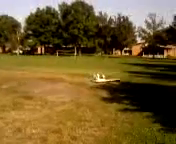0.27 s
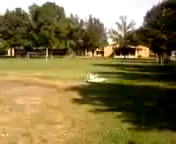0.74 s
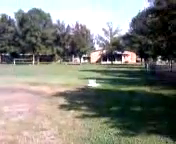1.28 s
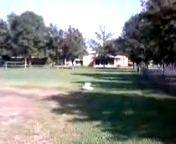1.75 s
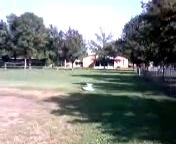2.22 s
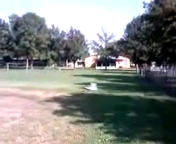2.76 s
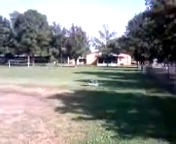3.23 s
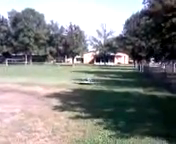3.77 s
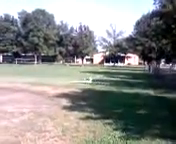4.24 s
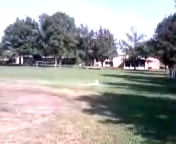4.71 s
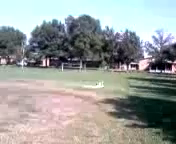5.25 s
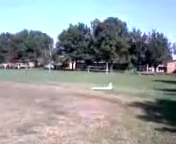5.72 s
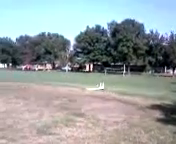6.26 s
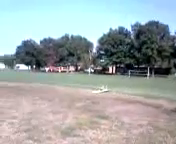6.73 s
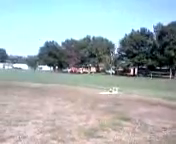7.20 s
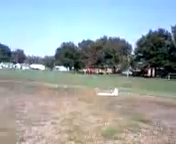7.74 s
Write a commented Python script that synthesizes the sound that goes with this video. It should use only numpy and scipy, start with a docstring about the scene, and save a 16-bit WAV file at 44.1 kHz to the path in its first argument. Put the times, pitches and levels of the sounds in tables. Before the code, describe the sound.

The small two-stroke engine of a model hovercraft buzzes on an open lawn. Almost at once it misfires and sags in pitch, with a brief hollow knock on the microphone. It then revs back up and holds a steady, raspy buzz whose tone shifts as the craft turns. The fan hums and rushes softly underneath, and a light breeze touches the distant, narrow-sounding microphone.

```python
"""The small two-stroke engine of a model hovercraft buzzes round a lawn, one exhaust pop a shaft turn.
The throttle closes, it misses every other firing and sags, then catches and revs back to a steady buzz.
The exhaust changes colour as the craft turns; hull, lawn and trees throw it back, and the fan hums and
rushes underneath. A breeze touches the distant, narrow-band microphone; the loudest pops overload it."""
import sys
import numpy as np
from scipy import signal
from scipy.fft import rfft, irfft
from scipy.io import wavfile
from scipy.ndimage import map_coordinates

SR = 44100
rng = np.random.default_rng(int(sys.argv[2]) if len(sys.argv) > 2 else 0)


def unload_wav(signal):
    """Save mono or channel-first audio to the path in sys.argv[1] as 16-bit WAV at rate SR, clipped to [-1, 1]."""
    wavfile.write(
        sys.argv[1],
        SR,
        np.round(np.clip(np.atleast_2d(signal).T, -1, 1) * 32767).astype(np.int16),
    )


N = 351918
T = np.arange(N) / SR
HZ = np.fft.rfftfreq(N, 1 / SR)


def gain_of(db):
    """Decibels to amplitude."""
    return 10 ** (np.asarray(db) / 20)


def unit_rms(x):
    """Scales to an rms of one."""
    return x / np.sqrt(np.mean(x ** 2) + 1e-20)


def at_hz(points, hz):
    """Reads a spectrum table on a log-frequency axis."""
    f, value = np.transpose(points)
    return np.interp(np.log(hz + 1), np.log(f + 1), value)


def curves(rows):
    """Each column of a time table as an automation curve."""
    times, *columns = np.transpose(rows)
    return [np.interp(T, times, column) for column in columns]


def swells(rows):
    """A bell-shaped rise and fall for each row."""
    return sum(gain_of(db) * np.exp(-(2 * (T - t) / length) ** 2) for t, db, length in rows)


def wander(rate_hz):
    """Slow random modulation, rms one."""
    return unit_rms(irfft(rfft(rng.standard_normal(N)) / (1 + (HZ / rate_hz) ** 4), N))


def noise(colour):
    """Steady noise of a given spectrum, rms one."""
    return unit_rms(irfft(rfft(rng.standard_normal(N)) * gain_of(at_hz(colour, HZ)), N))


def ring(x, colour, size=4096):
    """Causal filter: each click starts sharply and rings out with the given spectrum."""
    log_gain = np.log(gain_of(at_hz(colour, abs(np.fft.fftfreq(size, 1 / SR)))))
    response = np.fft.ifft(np.exp(np.conj(signal.hilbert(log_gain)))).real
    return signal.oaconvolve(x, response[:size // 2])[:N]


def running_rms(x, size=5001):
    """Level follower; the default window spans about a dozen firings."""
    window = signal.windows.hann(size)
    power = np.pad(x ** 2, size // 2, "reflect")
    return np.sqrt(signal.oaconvolve(power, window / window.sum(), "valid") + 1e-14)


def low_pass(x, hz):
    """Steep band limit."""
    return signal.oaconvolve(x, signal.firwin(511, hz, window=("kaiser", 9), fs=SR), "same")


def swept_bell(x, hz, width_hz, lift_db):
    """Boosts or cuts a band that follows the curve hz."""
    carrier = np.exp(2j * np.pi * np.cumsum(hz) / SR)
    pole = np.exp(-np.pi * width_hz / SR)
    band = 2 * (carrier * signal.lfilter([1 - pole], [1, -pole], x / carrier)).real
    return x + (gain_of(lift_db) - 1) * band


# colour of the outdoor bed: f/Hz, level/dB
AIR_COLOUR = [(30, -0.5), (200, -4.5), (700, 1.5), (1400, -6.5), (3300, -6), (3900, -4.5), (4450, -1.5),
              (4650, -17), (5200, -79.5)]

def open_air(level_db=-62):
    """The faint, steady hiss of the open air."""
    return gain_of(level_db) * noise(AIR_COLOUR)


# colour of the wind rumble: f/Hz, level/dB
BREEZE_COLOUR = [(15, -8), (30, -10), (60, -12), (110, -5), (180, -10.5), (350, -11), (900, -42),
                 (3000, -66)]
# gusts: t/s, level/dB, length/s
GUSTS = [(0.1, -62, 0.21), (0.41, -45, 0.25), (1.2, -65, 0.43), (1.9, -53, 0.86), (2.55, -48.5, 0.61),
         (3.2, -50.5, 0.57), (3.95, -61.5, 1)]

def breeze(calm_db=-59, lumpy_db=3):
    """Lumpy rumble of air on the microphone, swelling with each gust."""
    rumble = noise(BREEZE_COLOUR) * gain_of(lumpy_db * wander(4.5))
    return (gain_of(calm_db) + swells(GUSTS)) * unit_rms(rumble)


# thud hits: t/s, level/dB, length/s
THUDS = [(0.388, -45, 0.0084), (0.404, -29, 0.0074)]
# their hollow colour: f/Hz, level/dB
THUD_COLOUR = [(40, -11), (130, -6), (350, 20.5), (600, -7), (1500, -22), (4000, -70)]

def thuds():
    """Two short, hollow knocks on the microphone."""
    return swells(THUDS) * noise(THUD_COLOUR)


# crankshaft revs: t/s, rate/Hz
SHAFT_SPEED = [(0.0, 116.38), (0.2, 118.31), (0.3, 109.83), (0.45, 97.86), (0.6, 90.86), (0.7, 92.32),
               (0.82, 90.07), (1.0, 90.17), (1.1, 94.13), (1.35, 107.63), (1.55, 115.05), (1.9, 119.59),
               (2.1, 119.41), (2.4, 117.35), (2.8, 117.08), (3.45, 116.86), (3.7, 117.13), (4.2, 116.3),
               (4.55, 117.65), (4.85, 117.47), (5.15, 118.1), (5.5, 117.55), (5.9, 116.97), (6.1, 117.36),
               (6.7, 116.81), (7.1, 118.0), (7.3, 118.11), (7.7, 119.04), (7.98, 118.28)]

def shaft_turns():
    """Running count of turns of the shaft, which times both fan and firings."""
    return np.cumsum(curves(SHAFT_SPEED)[0]) / SR


# colour of the air through the fan: f/Hz, level/dB
RUSH_COLOUR = [(100, -25), (300, -4), (750, 0), (1100, -1.5), (1400, -3), (1800, 1.5), (2500, -8.5),
               (3500, -11.5), (4500, -44), (5200, -69)]
# its fader ride: t/s, level/dB
RUSH_LEVEL = [(0, -40.5), (0.3, -39), (0.62, -47.5), (1.1, -46.5), (1.7, -47.5), (2.6, -42.5), (3.8, -46.5),
              (4.6, -48), (5.6, -45), (6.7, -42.5), (7.05, -46.5), (7.98, -42)]

def fan_rush(chop=0.27, gusty_db=2.5):
    """Turbulent air, chopped once a turn of the shaft."""
    chopping = 1 + chop * np.cos(2 * np.pi * shaft_turns())
    rush = noise(RUSH_COLOUR) * chopping * gain_of(gusty_db * wander(1.9))
    return gain_of(curves(RUSH_LEVEL)[0]) * unit_rms(rush)


# fader ride of the blade hum, ahead of its trim: t/s, level/dB
HUM_LEVEL = [(0.0, -53), (0.22, -40.5), (0.73, -95), (1.02, -63), (1.3, -61.5), (1.77, -43.5),
             (2.45, -41.5), (4.85, -52.5), (5.38, -47), (6.31, -59.5), (7.15, -50.5), (7.35, -61),
             (7.95, -52)]
# its partials: multiple of the shaft speed, level/dB
HUM_PARTIALS = [(1, -18.5), (2, -0.5), (3, -7)]

def fan_hum(trim_db=2.0, blade_waver_db=2.0, weak_waver_db=3.5):
    """Clean tones of blades passing twice a turn; moving air sways the weaker tones most."""
    turns = shaft_turns()
    tones = 0
    for order, db in HUM_PARTIALS:
        waver_db = blade_waver_db if order == 2 else weak_waver_db
        tones += gain_of(db + waver_db * wander(11)) * np.cos(2 * np.pi * order * turns)
    return gain_of(curves(HUM_LEVEL)[0] + trim_db) * unit_rms(tones)


# grit of the buzz: t/s, roughness (0 clean, 1 hoarse)
ROUGHNESS = [(0, .3), (.6, .15), (.85, .4), (1.1, .2), (1.7, .2), (1.9, .05), (2.15, .1), (2.23, 1),
             (2.33, .15), (2.48, .8), (2.67, .15), (2.8, .6), (3.1, .15), (3.33, 1), (3.5, .35),
             (3.63, .85), (3.8, .15), (3.98, .15), (4.08, .85), (4.37, .65), (4.48, .05), (5.0, .05),
             (5.08, .4), (5.3, 0), (5.7, .05), (5.83, .7), (6.05, .25), (6.35, .9), (6.85, 1), (6.96, .05),
             (7.15, .05), (7.23, .9), (7.35, .3), (7.7, .3), (7.83, .7), (7.98, .05)]

def by_roughness(clean, hoarse):
    """Morphs a setting from clean to hoarse as the burn and the air on the way grow unsteady."""
    return clean + (hoarse - clean) * curves(ROUGHNESS)[0]


# decay of the tree reverb: f/Hz, t60/s
TREE_DECAY = [(100, 0.3), (1000, 0.8), (3000, 0.69), (6000, 0.2)]
# its colour: f/Hz, level/dB
TREE_COLOUR = [(300, -8), (1000, -6), (2500, 0), (4000, -1)]

def trees(x, drift_per_s=(.5, 9), density=.05):
    """Scatter from trunks and leaves, as loud as x; three tails crossfade as the craft moves."""
    wet = np.zeros(N)
    drift = np.cumsum(by_roughness(*drift_per_s)) / SR
    for k in range(3):
        taps = rng.standard_normal(SR) * (rng.random(SR) < density)
        hz, t, spectra = signal.stft(taps, SR, nperseg=256)
        t60 = at_hz(TREE_DECAY, hz)[:, None]
        decay = gain_of(at_hz(TREE_COLOUR, hz)[:, None] - 60 * t / t60) / np.sqrt(t60)
        tail = signal.istft(spectra * decay, SR, nperseg=256)[1]
        wet += np.cos(np.pi * (drift + k / 3)) * signal.oaconvolve(x, unit_rms(tail))[:N]
    return wet / running_rms(wet, size=40001) * running_rms(x, size=40001)


# early reflections: t/s, hull echo as a share of the direct sound, lawn bounce lag/s
REFLECTIONS = [(0, 0.51, 0.00029), (1.15, 0.11, 0.00037), (2.05, 0.14, 0.00065), (3.1, 0.06, 0.00062),
               (3.55, 0.18, 0.00077), (4.0, 0.1, 0.00081), (4.4, 0.39, 0.0016), (5.2, 0.46, 0.0011),
               (5.75, 0.11, 0.00132), (6.4, 0.19, 0.0012), (7.2, 0.11, 0.001), (7.8, 0.22, .0011)]
# tree return, whichever way the outlet points, weighed against the direct level: t/s, level/dB
TREE_RETURN = [(0, -27), (.3, -24.5), (.6, -23), (1.1, -28.5), (1.35, -23), (1.7, -25), (2, -25), (3, -24),
               (4.7, -28), (6.5, -24), (7.98, -24.5)]

def travel(x, direct_level, hull_s=0.001486, duct_s=0.002358, duct=0.18, ground=0.23,
           sway=0.027, bumps=0.3):
    """Direct sound, echoes off hull, fan duct and lawn that shift as the craft rocks, and the trees."""
    def delayed(lag_s):
        """The sound after a changing delay."""
        return map_coordinates(x, [(T - lag_s) * SR], order=1)

    hull, ground_s = curves(REFLECTIONS)
    rock = 1 + sway * wander(0.86)
    craft = hull * delayed(hull_s * rock) + duct * delayed(duct_s * rock)
    lawn = ground * delayed(ground_s * (1 + by_roughness(0, bumps) * wander(12.0)))
    wet_share = gain_of(curves(TREE_RETURN)[0]) / direct_level  # weaker direct sound, more trees
    return x + craft + lawn + wet_share * trees(x)


# moving notch or peak of the lawn bounce: t/s, f/Hz, gain/dB
LAWN_SWEEP = [(0, 2550, -5.5), (.6, 2340, 4), (.9, 3320, 6.5), (1.6, 3550, 7), (1.9, 3190, -10),
              (2.15, 3130, -10.5), (2.3, 3120, -16), (2.42, 2600, -4.5), (2.8, 2940, -12),
              (3.2, 2510, -5.5), (3.36, 2950, -2), (3.58, 3060, -12), (3.75, 3140, 0), (3.95, 3070, 8),
              (4.1, 3320, -3.5), (4.7, 3120, -3), (5.2, 3260, 3), (5.3, 3210, 8), (5.6, 3020, -9),
              (5.9, 3160, -1), (6.15, 3030, -2.5), (6.45, 3150, -11), (6.7, 2910, -8), (6.95, 2810, -13.5),
              (7.3, 3340, -13), (7.6, 3170, -1.5), (7.98, 3160, -4)]

def lawn_sweep(x, width_hz=380):
    """The bounce off the lawn hollows or lifts a band of the buzz as the craft moves."""
    hz, lift_db = curves(LAWN_SWEEP)
    return swept_bell(x, hz, width_hz, lift_db)


def shimmer(x, depth_db=2.5, size=1024):
    """Turbulent air makes neighbouring partials swell and fade on their own, several times a second."""
    frames = dict(nperseg=size, noverlap=size * 3 // 4)
    spectra = signal.stft(x, **frames)[2]
    patch = np.outer(signal.windows.hann(7), signal.windows.hann(21))  # bins by frames
    field = unit_rms(signal.fftconvolve(rng.standard_normal(spectra.shape), patch, "same"))
    return signal.istft(spectra * gain_of(depth_db * field), **frames)[1][:N]


def firings(misfire_s=(0.22, 0.6), stall_s=(0.445, 0.495), miss_db=-20, limp_db=-1.5,
            uneven_db=.6, jitter_s=(4e-6, 3e-5), stumble_db=2.5, stumble_s=0.000257,
            start_turn=.78, hunt_turns=.003):
    """Time and strength of each burn, one a turn; starved, the engine stumbles and skips every other."""
    turns = start_turn + shaft_turns() + hunt_turns * wander(12.0)
    count = np.arange(1, int(turns[-10]) + 1)
    t = np.interp(count, turns, T)
    late, strong = rng.standard_normal((len(t), 2)).T
    starved = (t > misfire_s[0]) & (t < misfire_s[1])
    stalled = (t > stall_s[0]) & (t < stall_s[1])
    missed = (starved & (np.cumsum(starved) % 2 == 1)) | stalled
    limp = limp_db * (-1) ** count * np.interp(t, T, wander(0.87))  # a weak burn follows a strong one
    choke_db = -4.5 * np.exp(-(2 * (t - .42) / .2) ** 2)  # weakest in the middle of the misfire
    spread_db = np.where(starved, stumble_db, uneven_db)
    spread_s = np.where(starved, stumble_s, np.interp(t, T, by_roughness(*jitter_s)))
    return t + late * spread_s, gain_of(spread_db * strong + limp + choke_db + miss_db * missed)


# colour of the escaping gas: f/Hz, level/dB
JET_COLOUR = [(500, -12), (2200, 0)]
# colour of one pop: f/Hz, level/dB
POP_COLOUR = [(60, -41.5), (120, -44.5), (200, -35.5), (280, -25.5), (350, -19), (470, -15.5), (590, -16.5),
              (710, -16.5), (820, -18.5), (950, -15.5), (1100, -16.5), (1550, -18.5), (2150, -13),
              (2350, -9.5), (2750, 0), (3350, -3.5), (3600, -12), (3850, -25.5), (4100, -32), (4500, -37)]

def exhaust_pops(times, strengths, jet_s=0.0047, jet_share=(.008, .03)):
    """A pressure step each time the exhaust port opens, followed by a short hissing jet of gas."""
    at = np.clip(times * SR, 8, N - 9)
    near = at.astype(int)[:, None] + np.arange(-8, 9)
    clicks, triggers = np.zeros(N), np.zeros(N)
    clicks[near] = strengths[:, None] * np.sinc(near - at[:, None])  # placed between samples
    triggers[at.astype(int)] = strengths
    jet_envelope = signal.lfilter([1], [1, -np.exp(-1 / (jet_s * SR))], triggers)
    jet = by_roughness(*jet_share) * jet_envelope * noise(JET_COLOUR)
    return ring(clicks + jet, POP_COLOUR)


# crossovers between drone, honk, snarl, rasp, sizzle and fizz: f/Hz
CROSSOVERS = [1000, 1650, 2400, 3120, 3820]
# hollow drone of pipe and hull: t/s, level/dB, f/Hz
DRONE = [(0, -40.5, 734), (.25, -37.5, 680), (.6, -50, 695), (.77, -50.5, 675), (.92, -41.5, 630),
         (1.0, -50, 600), (1.2, -40.5, 520), (1.3, -50, 630), (1.42, -41, 515), (2, -45, 620),
         (2.7, -46, 614), (3.4, -45.5, 676), (3.73, -39.5, 973), (4.2, -49.5, 645), (4.7, -41, 660),
         (5.4, -33, 730), (5.8, -36, 683), (6, -33, 700), (6.15, -38.5, 688), (6.8, -38, 755),
         (7.45, -40, 860), (7.75, -33.5, 840), (7.98, -37, 800)]
# honk of the pipe: t/s, level/dB, f/Hz
HONK = [(0.0, -49, 1200), (0.22, -41.5, 1150), (0.5, -49.5, 1490), (0.6, -49, 1320), (0.85, -48, 1600),
        (1.14, -41.5, 1590), (1.24, -41.5, 1140), (1.45, -39.5, 1300), (2.02, -35, 1420), (2.86, -45, 1400),
        (2.95, -39.5, 1400), (3.42, -38, 1420), (3.55, -42, 1320), (3.72, -38, 1100), (3.92, -49.5, 1150),
        (4.29, -41.5, 1315), (4.4, -49, 1330), (4.8, -49, 1556), (5.15, -45.5, 1580), (5.75, -45.5, 1550),
        (6.02, -41, 1500), (6.18, -51, 1450), (6.8, -40, 1100), (7.2, -39.5, 1136), (7.98, -46, 1090)]
# snarl, strongest as the engine pulls back up to speed: t/s, level/dB, f/Hz
SNARL = [(0.0, -33, 2200), (0.33, -34.5, 2210), (0.42, -33, 2180), (0.48, -32.5, 2050), (0.66, -33, 2270),
         (0.75, -32, 2200), (0.87, -25, 2150), (0.99, -24.5, 2180), (1.14, -22, 2130), (1.89, -28.5, 1960),
         (2.1, -25.5, 2030), (2.16, -29, 2020), (2.61, -35.0, 2040), (3.21, -33.0, 1980),
         (3.24, -37.5, 1950), (3.63, -33, 2090), (4.65, -33, 2140), (4.71, -30.5, 2130), (4.86, -34, 2150),
         (5.16, -31.5, 2060), (5.19, -27.5, 2160), (5.25, -36.5, 2140), (5.34, -30.5, 2120),
         (5.49, -34.0, 2050), (5.76, -29, 2210), (5.97, -30.5, 2010), (6.15, -35, 2200), (6.3, -39.5, 2100),
         (6.51, -33.0, 2120), (6.78, -35, 2110), (7.02, -32.0, 2040), (7.44, -36, 2050),
         (7.62, -32.5, 2110), (7.97, -35, 2170)]
# main rasp, as the throttle moves and the outlet swings towards us and away: t/s, level/dB, f/Hz
RASP = [(0.0, -17.5, 2700), (0.15, -16.5, 2980), (0.21, -24, 2850), (0.39, -23, 2740), (0.48, -32.5, 2910),
        (0.51, -26, 2720), (0.6, -21.5, 2850), (0.63, -16.5, 2820), (0.72, -20.5, 2830),
        (0.81, -24.5, 2970), (0.87, -25.5, 2630), (1.08, -19.5, 2570), (1.11, -20, 2690), (1.29, -17, 2610),
        (1.41, -17.0, 2900), (1.53, -17, 2840), (1.74, -19.5, 2760), (1.8, -21.0, 2700), (2.22, -26, 2690),
        (2.31, -30, 2680), (2.37, -33.5, 2930), (2.55, -26.0, 2830), (2.7, -30, 2780), (2.79, -30, 3010),
        (2.85, -30, 2810), (3.0, -26, 3070), (3.24, -26.5, 2960), (3.39, -28, 2650), (3.57, -24.0, 2620),
        (3.78, -27.5, 2850), (3.9, -20.5, 2750), (4.02, -26, 3060), (4.05, -22.5, 2740), (4.2, -30.5, 2840),
        (4.26, -23.0, 2700), (4.32, -27.5, 2750), (4.86, -25, 2850), (5.01, -29, 2850), (5.07, -27.5, 2880),
        (5.16, -29, 2890), (5.25, -25, 3000), (5.52, -25.5, 2580), (5.73, -23, 2830), (5.85, -24.5, 2620),
        (5.94, -30, 2720), (6.0, -25.5, 2970), (6.03, -23.5, 2710), (6.27, -26, 2940), (6.45, -26.5, 2520),
        (6.84, -32, 2860), (6.93, -29, 2770), (7.23, -27.5, 2840), (7.38, -24, 2720), (7.74, -25.5, 2850),
        (7.92, -22.0, 2770), (7.97, -25, 2760)]
# sizzle of the muffler's top resonance, with open throttle and facing outlet: t/s, level/dB, f/Hz
SIZZLE = [(0.0, -15, 3370), (0.21, -15.0, 3470), (0.36, -25.5, 3500), (0.6, -22.5, 3430), (0.81, -24, 3250),
          (0.99, -38, 3330), (1.11, -35.5, 3320), (1.26, -46, 3100), (1.35, -40, 3080), (1.47, -45, 3100),
          (1.62, -34.5, 3110), (1.86, -36.5, 3190), (1.95, -30.5, 3510), (2.22, -28.0, 3500),
          (2.28, -22, 3340), (2.52, -27, 3300), (2.61, -25.5, 3300), (2.82, -25.0, 3300), (2.88, -24, 3330),
          (3.0, -27.5, 3280), (3.06, -22.5, 3340), (3.18, -26, 3040), (3.36, -28.5, 3600),
          (3.51, -22.5, 3420), (3.6, -23, 3390), (3.72, -31.5, 3350), (3.84, -24.0, 3540),
          (3.99, -30.5, 3140), (4.05, -31, 3420), (4.14, -27.5, 3350), (4.8, -24.5, 3590),
          (5.19, -29.5, 3270), (5.25, -23, 3100), (5.55, -24.5, 3330), (5.7, -25, 3170), (5.82, -37, 3230),
          (5.85, -29, 3340), (6.03, -30, 3400), (6.21, -26, 3250), (6.54, -31.5, 3620), (6.66, -29.5, 3600),
          (6.9, -32, 3600), (7.11, -30.5, 3320), (7.29, -36.5, 3570), (7.59, -28.5, 3380),
          (7.8, -26.5, 3470), (7.83, -34, 3300), (7.97, -26, 3330)]

def engine(fizz_db=-36, fizz_follows=0.49, yaw_hz=20, flutter_db=.7):
    """The two-stroke buzz; each band is beamed differently as the craft turns and flutters in the air."""
    drone_db, drone_hz = curves(DRONE)
    honk_db, honk_hz = curves(HONK)
    snarl_db, snarl_hz = curves(SNARL)
    rasp_db, rasp_hz = curves(RASP)
    sizzle_db, sizzle_hz = curves(SIZZLE)
    pops = exhaust_pops(*firings())
    direct_level = np.hypot(gain_of(rasp_db), gain_of(sizzle_db))
    spectrum = rfft(lawn_sweep(travel(pops, direct_level)))
    below = [0] + [1 / (1 + (HZ / edge) ** 32) for edge in CROSSOVERS] + [1]
    drone, honk, snarl, rasp, sizzle, fizz = [
        irfft(spectrum * (upper - lower), N) for lower, upper in zip(below, below[1:])]
    yaw = yaw_hz * wander(4.9)
    bands = [(shimmer(swept_bell(drone, drone_hz, width_hz=190, lift_db=8)), drone_db),
             (shimmer(swept_bell(honk, honk_hz, width_hz=180, lift_db=6)), honk_db),
             (swept_bell(snarl, snarl_hz, width_hz=220, lift_db=5), snarl_db),
             (swept_bell(rasp, rasp_hz + yaw, width_hz=380, lift_db=6), rasp_db),
             (swept_bell(sizzle, sizzle_hz + yaw, width_hz=300, lift_db=5), sizzle_db),
             (fizz, fizz_follows * rasp_db + fizz_db)]
    return sum(gain_of(db + flutter_db * wander(44)) * band / running_rms(band) for band, db in bands)


def scene():
    """Mono mix: engine and fan over breeze, thuds and open air."""
    return (engine() + fan_hum() + fan_rush() + breeze() + thuds() + open_air())[None]


def record(dry, band_hz=4560, ceiling=.68, knee_share=.92, top_hz=16000):
    """A narrow-band microphone whose amplifier flattens the tallest pops."""
    x = low_pass(dry[0], band_hz)
    knee = ceiling * knee_share
    headroom = ceiling - knee
    over = np.maximum(abs(x) - knee, 0)
    clipped = np.clip(x, -knee, knee) + np.sign(x) * headroom * np.tanh(over / headroom)
    return low_pass(clipped, top_hz)[None]


dry = scene()
out = record(dry)
unload_wav(out)
```